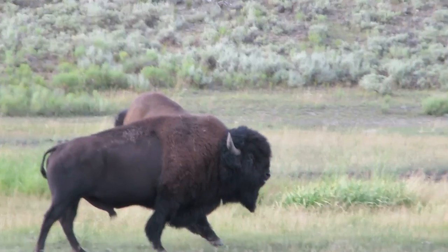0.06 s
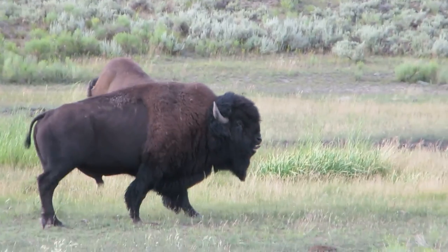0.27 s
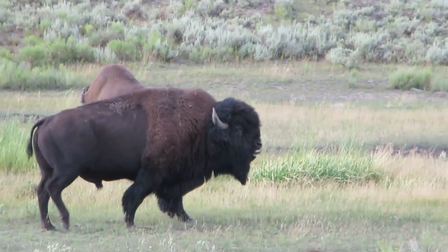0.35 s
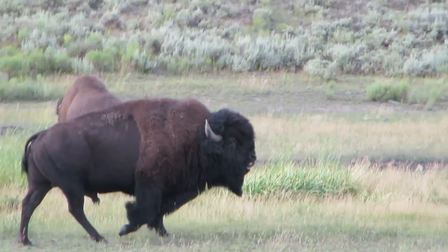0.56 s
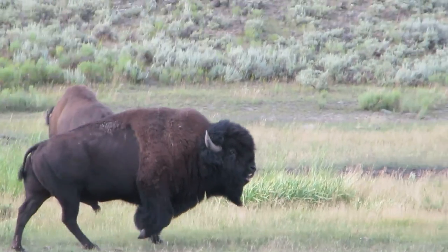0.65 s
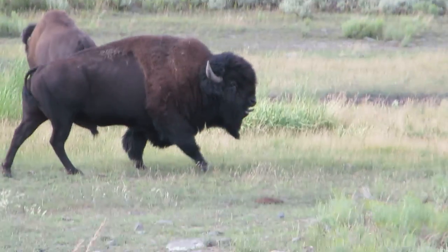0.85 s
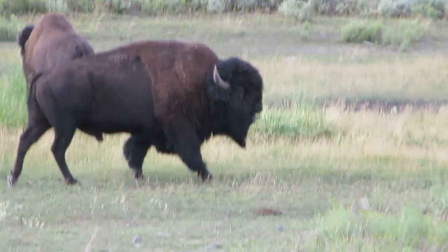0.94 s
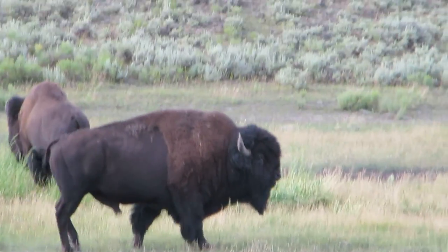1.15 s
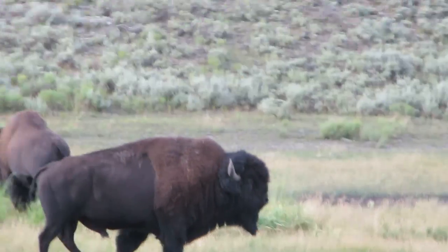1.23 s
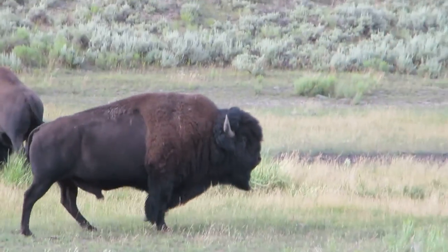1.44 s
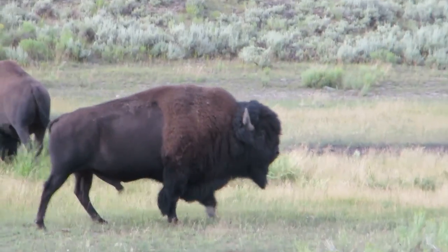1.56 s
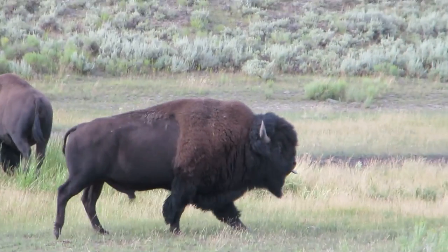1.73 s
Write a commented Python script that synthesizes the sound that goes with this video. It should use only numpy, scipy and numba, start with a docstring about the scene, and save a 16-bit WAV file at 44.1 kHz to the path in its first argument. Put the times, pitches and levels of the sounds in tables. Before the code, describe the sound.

A bison gives one low, pulsing growl over a soft breeze and an idling engine.

```python
"""An engine idles near an open plain, under a soft breeze. From about 0.2 s a walking bison gives one
low growl: air rasps through once a beat, and slow, separate beats of the vocal folds ring its long
throat and chest. Dry grass swishes as the call starts, a stalk snaps, and a hiss swells at its height.
From 0.8 s wind bumps the microphone a few times. The growl ends near 1.2 s; the grass swishes twice more."""
import sys
import numpy as np
from scipy import signal
from scipy.fft import rfft, irfft
from scipy.io import wavfile
from scipy.ndimage import uniform_filter1d
from numba import njit

SR = 44100
rng = np.random.default_rng(int(sys.argv[2]) if len(sys.argv) > 2 else 0)


def wav_record(signal):
    """Record a signal, one row per channel, as 16-bit PCM in the file named by sys.argv[1]."""
    frames = np.transpose(np.atleast_2d(signal))
    bounded = np.clip(frames, -1, 1)
    # unit amplitude maps onto the largest positive 16-bit level
    quanta = np.round(bounded * 32767).astype(np.int16)
    wavfile.write(sys.argv[1], SR, quanta)


N = 79380
TIME_S = np.arange(N) / SR


def undb(db):
    """Decibels to gain."""
    return 10 ** (np.asarray(db) / 20)


def level(x, db):
    """Scale to an rms level."""
    return x * undb(db) / np.sqrt(np.mean(x ** 2) + 1e-18)


def curve(rows):
    """Linear interpolation of (t/s, value) rows."""
    return np.interp(TIME_S, *np.array(rows).T)


def bell(peak_s, half_width_s):
    """Gaussian envelope, 1/e at the half-width."""
    return np.exp(-((TIME_S - peak_s) / half_width_s) ** 2)


def walk(rate_hz):
    """Smooth random drift, spread near 1."""
    hold = int(SR / rate_hz)
    steps = np.repeat(rng.standard_normal(N // hold + 1), hold)
    return 1.3 * uniform_filter1d(uniform_filter1d(steps, hold), hold)[:N]


@njit
def svf(x, hz, width_hz):
    """State-variable band-pass with moving centre and width."""
    y, band, low = np.empty(len(x)), 0., 0.
    for i in range(len(x)):
        g, k = np.tan(np.pi * hz[i] / SR), width_hz[i] / hz[i]
        y[i] = (band + g * (x[i] + 1e-18 - low)) / (1 + g * (g + k))
        band, low = 2 * y[i] - band, low + 2 * g * y[i]
    return y


def ring(x, hz, width_hz, damping_hz=0):
    """Resonance, unity peak gain when undamped; damping widens and weakens it."""
    return svf(x, hz * np.ones(N), (width_hz + damping_hz) * np.ones(N)) * width_hz / hz


def ring_twice(x, hz, width_hz):
    """Two equal resonances in series."""
    return ring(ring(x, hz, width_hz), hz, width_hz)


def colour(x, points):
    """Shape a spectrum by (f/Hz, gain/dB) points."""
    hz, db = np.array(points).T
    gain_db = np.interp(np.log(np.fft.rfftfreq(N, 1 / SR) + 1), np.log(hz), db)
    return irfft(rfft(x) * undb(gain_db), N)


def lowpass(x, hz, order):
    """Butterworth roll-off."""
    return signal.sosfilt(signal.butter(order, hz, fs=SR, output="sos"), x)


def clicks(times_s, sizes):
    """One impulse per time."""
    return np.bincount((times_s * SR).astype(int), sizes, N)[:N]


def stereo(mid, side):
    """Mid/side to left/right."""
    return np.array([mid + side, mid - side])


# engine lines: multiple of firing rate, relative level/dB
IDLE_ORDERS_DB = [(1, 0), (2, -6), (3, -4.5), (4, -8), (5, -11.5), (5.75, -11), (7.4, -9.5), (8, -18.5),
                  (10, -14), (15, -21), (17, -22.5), (21, -24.5)]

def idle(firing_hz=33.11, fundamental_db=-36):
    """Engine hum: lines on the firing rate, wavering in pitch and level."""
    cycles = np.cumsum(firing_hz * (1 + .0037 * walk(3.5))) / SR
    hum = sum(undb(db + walk(7.1)) * np.sin(2 * np.pi * (multiple * cycles + rng.random()))
              for multiple, db in IDLE_ORDERS_DB)
    return np.sqrt(2) * undb(fundamental_db) * hum


# breeze and far background spectrum: f/Hz, relative level/dB
BREEZE_SPECTRUM_DB = [(20, -23.5), (50, -8), (110, -11.5), (200, -7), (330, -17.5), (420, -17), (700, -21),
                      (1400, -24), (2000, -32), (3600, -42.5), (6000, -46.5), (10000, -52), (15000, -59.5)]
# side against mid: f/Hz, level/dB
BREEZE_SIDE_DB = [(30, -57), (120, -39.5), (300, -7), (1000, -6.5), (2500, 5.5), (6000, 0)]

def breeze():
    """Soft air, centred in the bass and wide in the treble, over a low rumble."""
    mid, side = (colour(rng.standard_normal(N), BREEZE_SPECTRUM_DB) for _ in range(2))
    air = stereo(mid, colour(side, BREEZE_SIDE_DB)) * undb(.4 * walk(10))
    rumble = ring_twice(rng.standard_normal(N), hz=182, width_hz=182)
    return level(air, db=-38.5) + level(rumble, db=-42.5)


FOLDS_START_S, FOLDS_END_S = .25, 1.185
# vocal fold beat rate: t/s, f/Hz
BEAT_RATE_HZ = [(0.25, 44.95), (0.3, 42.75), (0.345, 34.57), (0.405, 43.55), (0.52, 25.64), (0.59, 30.23),
                (0.68, 41.58), (0.8, 42.59), (1.03, 40.03), (1.1, 27.38), (1.2, 22.23)]

def fold_closures(jitter_s=.0003):
    """Times at which the folds snap shut: once a cycle, never quite evenly."""
    beating = (TIME_S > FOLDS_START_S) & (TIME_S < FOLDS_END_S)
    cycles = np.cumsum(curve(BEAT_RATE_HZ) * beating) / SR
    beats_s = TIME_S[np.searchsorted(cycles, np.arange(1, int(cycles[-1]) + 1))]
    return beats_s + jitter_s * rng.standard_normal(len(beats_s))


def fold_openings(beats_s, lead_s=.0017):
    """The folds part briefly just before each closure."""
    return sum(bell(at_s - lead_s, half_width_s=.0028) for at_s in beats_s)


# rasping air: t/s, relative level/dB
AIRFLOW_DB = [(.21, -16.5), (.285, -7), (.34, -7), (.42, -6), (.49, -9), (.56, -5), (.7, -3), (.9, -2),
              (1.05, -1.5), (1.12, -7.5), (1.21, -42)]
# rasp brightens as the mouth opens, then sinks: t/s, frequency ratio
RASP_RATIO = [(.3, .94), (.6, 1.018), (.8, 1.01), (1.0, 0.956), (1.12, .91)]
# rasp resonances: unshifted f/Hz, width/Hz, relative puff level/dB, relative leak level/dB
RASP_RESONANCES = [(680, 59, -14.5, -11.5), (928, 85, -7.5, -19.5), (1477, 850, -11, -5.5),
                   (1903, 360, 0, -10.5), (2608, 450, 1.5, -4.5), (3046, 560, 3, -10.5),
                   (4120, 430, -18, -23.5), (6500, 2800, -30, -33.5)]

def rasp(openings):
    """A puff of air at each fold opening, over a continuous leak."""
    air = rng.standard_normal((2, N)) * undb(curve(AIRFLOW_DB) + walk(230))
    mid_side = np.zeros((2, N))
    for hz, width_hz, puff_db, leak_db in RASP_RESONANCES:
        centre_hz = hz * curve(RASP_RATIO) * (1 + .013 * walk(30))
        flow = undb(puff_db + walk(40)) * openings + undb(leak_db + 2 * walk(87.94))
        mid_side += [ring_twice(noise * flow, centre_hz, width_hz) for noise in air]
    mid, side = mid_side
    return level(stereo(mid, .14 * side), db=-49)


def growl(beats_s, openings, start_s=.21, flutter_per_s=60, pan_db=.5):
    """Fold beats and weak random flutter drive chest, throat and upper resonances."""
    sounding = (TIME_S > start_s) & (TIME_S < FOLDS_END_S)
    closures = clicks(beats_s, undb(.7 * rng.standard_normal(len(beats_s))))
    flutter = sounding * (rng.random(N) < flutter_per_s / SR) * rng.choice([-1, 1], N)
    pulses = closures + .17 * flutter
    pan = undb([[pan_db / 2], [-pan_db / 2]])
    return chest(pulses, sounding) + throat(pulses, openings) + pan * croak(pulses, beats_s)


# chest drive: t/s, relative level/dB
CHEST_DRIVE_DB = [(.21, -26.5), (.235, 0.5), (.32, -5.5), (.42, -10), (.58, -16.5), (.7, -4.5), (.78, 1),
                  (.92, -4), (1.06, -3), (1.13, -12), (1.2, -22)]

def chest(pulses, sounding):
    """Pulses and a little noise ring chest and belly."""
    drive = (pulses + .025 * sounding * rng.standard_normal(N)) * undb(curve(CHEST_DRIVE_DB))
    chest_tone = ring_twice(drive, hz=164.4, width_hz=25.8)
    belly_tone = ring_twice(drive, hz=113.7, width_hz=39)
    return level(chest_tone, db=-32) + level(belly_tone, db=-35)


# lowest throat resonance, rising as the mouth opens: t/s, f/Hz
THROAT_MODE_HZ = [(.25, 188), (.31, 210.3), (.38, 233.4), (.44, 237), (.52, 217.3), (.64, 255.7),
                  (.74, 227), (.98, 234), (1.08, 242.6), (1.19, 201.7)]
# beat strength: t/s, relative level/dB
EFFORT_DB = [(.26, -2.5), (.31, 1), (.347, -2.5), (.375, 2.5), (.4, -11.5), (.422, 2.5), (.45, -4.5),
             (.48, 5), (.515, 1), (.585, 2.5), (.64, -1.5), (.7, -2), (.79, 0.5), (.86, 5.5), (.94, -2.5),
             (.985, 3.5), (1.03, 3), (1.09, -10), (1.16, -4.5)]

def throat(pulses, openings):
    """Pulses ring the lowest throat resonance; the open folds damp it."""
    centre_hz = curve(THROAT_MODE_HZ)
    tone = ring(pulses * undb(curve(EFFORT_DB)), centre_hz, width_hz=12.1, damping_hz=78 * openings)
    boom = lowpass(ring(tone, centre_hz, width_hz=190), hz=304, order=3)
    return level(boom, db=-23.2)


# closure sharpness, as drive to the upper resonances: t/s, relative level/dB
CLOSURE_DB = [(.27, -13), (.298, 1), (.325, 1.5), (.4, -14), (.425, -7), (.45, -12), (.477, 1), (.51, -17),
              (.615, -11), (.643, 2), (.69, 0), (.77, -6), (.85, -2), (.94, -5), (.99, -3), (1.08, -17),
              (1.17, -17)]
# upper throat resonances: f/Hz, width/Hz, relative level/dB
UPPER_RESONANCES = [(455, 50, -6), (615, 45, -1), (672, 32, 5), (880, 110, -6), (1000, 80, 0),
                    (1250, 120, -11), (1480, 110, -11)]
# their damping, falling as the mouth opens: t/s, extra width/Hz
MOUTH_DAMPING_HZ = [(.3, 27), (.64, 20), (.76, 5), (1.1, 5)]

def croak(pulses, beats_s, bounce_s=.003, bounce_scatter_s=.0008, rattle_s=.006):
    """Sharp closures bounce once, rattle briefly and ring the upper resonances."""
    bounces_s = beats_s + bounce_s + bounce_scatter_s * rng.standard_normal(len(beats_s))
    bounces = clicks(bounces_s, np.full(len(beats_s), .65))
    rattle = signal.lfilter([1], [1, -np.exp(-1 / (rattle_s * SR))], pulses) * rng.standard_normal(N)
    drive = (pulses + bounces + .055 * rattle) * undb(curve(CLOSURE_DB))
    damping_hz = curve(MOUTH_DAMPING_HZ)
    upper = 0
    for k, (hz, width_hz, db) in enumerate(UPPER_RESONANCES):
        gain = (-1) ** k * undb(db + .7 * walk(40))  # adjacent tube modes swing in opposition
        upper = upper + gain * ring(drive, hz * (1 + .003 * walk(28)), width_hz, damping_hz)
    return level(lowpass(upper, hz=2000, order=2), db=-39.3)


def ground_scatter(x, t60_s=.16, tail_db=-11.5):
    """Ground and brush add a short, faint tail."""
    age_s = TIME_S[:N // 3]
    tail = rng.standard_normal((2, len(age_s))) * undb(-60 * age_s / t60_s)
    tail /= np.sqrt(np.sum(tail ** 2) / 2)
    return x + undb(tail_db) * signal.fftconvolve(x, tail, axes=1)[:, :N]


# grass swishes: t/s, half-width/s, level/dB
GRASS_SWISHES = [(0.233, 0.017, -56), (0.281, 0.0063, -56), (1.302, 0.035, -57), (1.412, 0.033, -60)]
# grass spectrum: f/Hz, relative level/dB
GRASS_SPECTRUM_DB = [(1500, -7), (4000, 1), (6000, 7.5), (8500, 1), (10800, 1), (12500, -6), (16000, -7)]

def grass():
    """Dry stalks brush past in short, grainy swishes."""
    envelope = sum(undb(db) * bell(at_s, half_width_s) for at_s, half_width_s, db in GRASS_SWISHES)
    grains = rng.standard_normal((2, N)) * undb(3.4 * walk(600))
    return envelope * level(colour(grains, GRASS_SPECTRUM_DB), db=0)


def stalk_snap():
    """A stalk snaps: one small, bright tick."""
    burst = rng.standard_normal(N) * bell(peak_s=.43, half_width_s=.0013)
    return level(ring_twice(burst, hz=5240, width_hz=790), db=-79.5)


def hiss(openings):
    """Breath hiss swells at the height of the call, pulsing with the fold openings."""
    air = rng.standard_normal((2, N)) * bell(peak_s=.78, half_width_s=.24) * (1 + .63 * openings)
    return level(np.array([ring_twice(noise, hz=5460, width_hz=2000) for noise in air]), db=-68.5)


# wind bumps: t/s, f/Hz, half-width/s, nominal peak level/dB
WIND_BUMPS = [(0.802, 114, 0.0075, -12), (.854, 97.5, 0.0071, -10), (1.017, 93, 0.0036, -9.5),
              (1.036, 61.6, .009, -19), (1.055, 89.7, 0.024, -18.5), (1.154, 99.4, 0.0059, -11.5)]

def wind_bumps():
    """Short, low pressure swings on the microphone, slightly unequal left and right."""
    swing = sum(-undb(db) * bell(at_s, half_width_s) * np.cos(2 * np.pi * hz * (TIME_S - at_s))
                for at_s, hz, half_width_s, db in WIND_BUMPS)
    return swing * (1 + .12 * np.array([walk(170), walk(150)]))


def scene():
    """The bison's call on the plain, amid engine, breeze, grass and wind bumps."""
    beats_s = fold_closures()
    openings = fold_openings(beats_s)
    call = ground_scatter(growl(beats_s, openings) + rasp(openings) + hiss(openings))
    return call + wind_bumps() + idle() + breeze() + grass() + stalk_snap()


def record(dry, fade_s=.003, top_hz=15700):
    """Fade both ends; cut the top steeply."""
    fade = np.minimum(np.minimum(TIME_S, TIME_S[-1] - TIME_S) / fade_s, 1)
    return signal.sosfilt(signal.ellip(10, .2, 80, top_hz, fs=SR, output="sos"), dry * fade)


dry = scene()
out = record(dry)
wav_record(out)
```